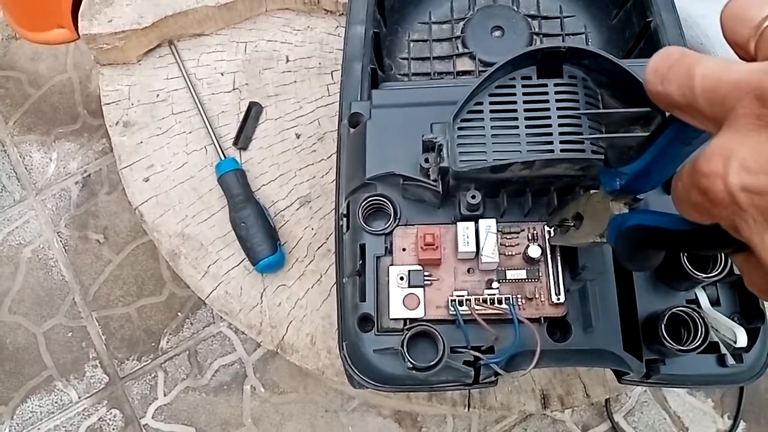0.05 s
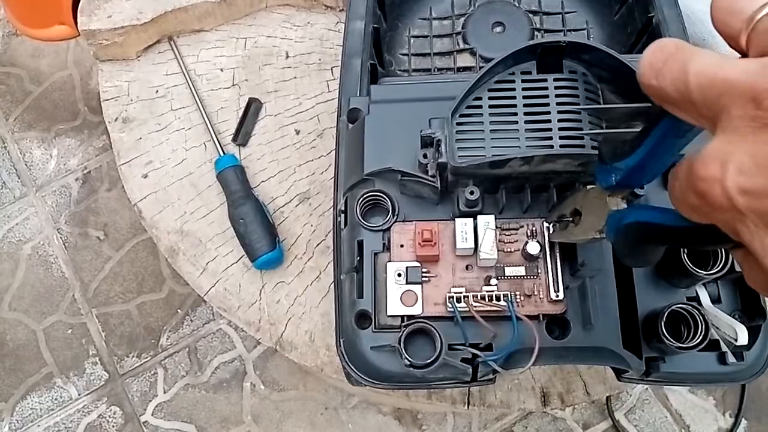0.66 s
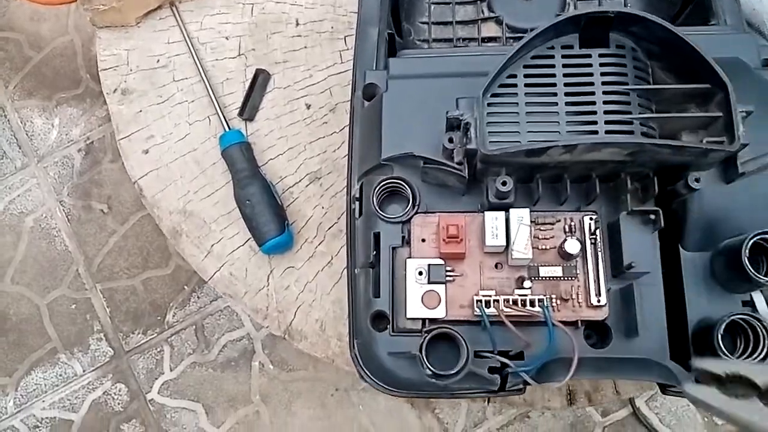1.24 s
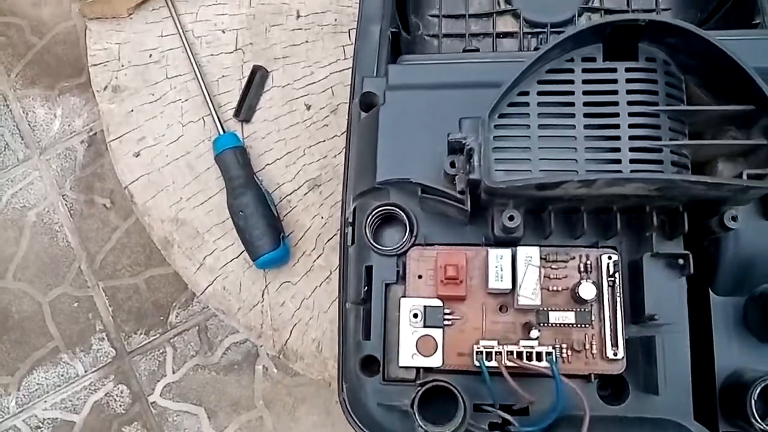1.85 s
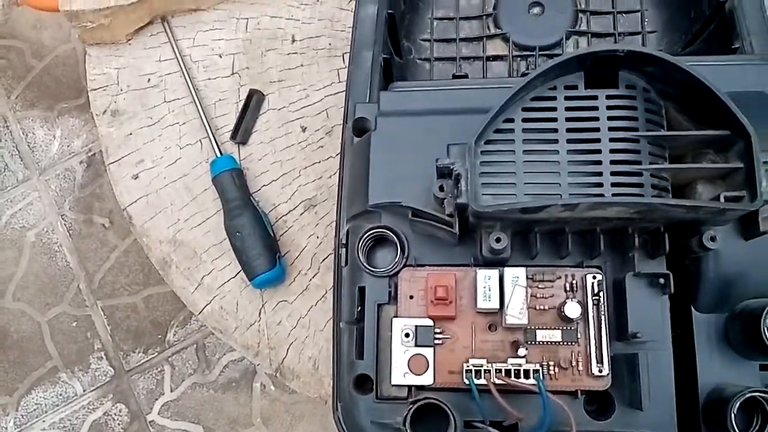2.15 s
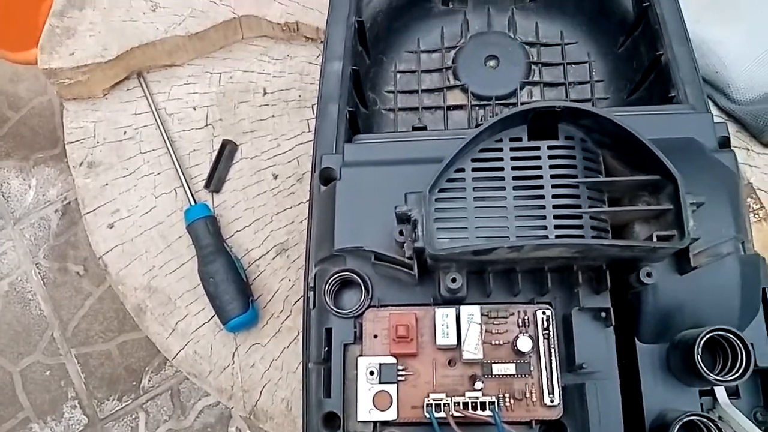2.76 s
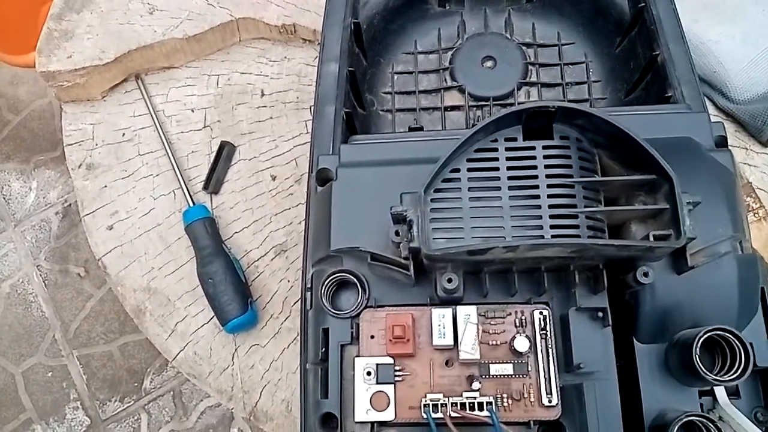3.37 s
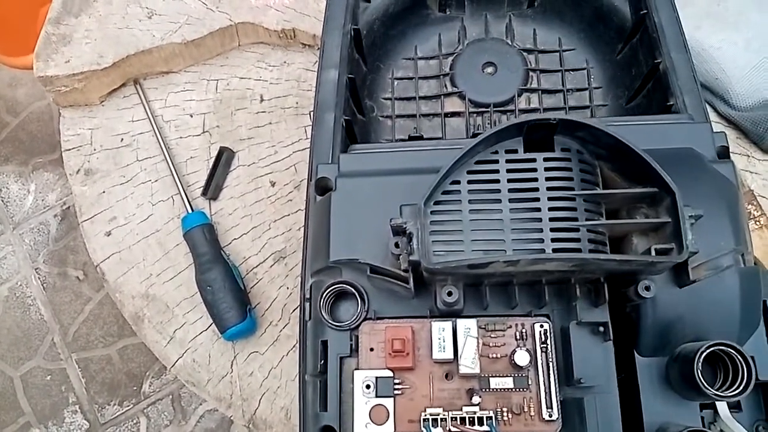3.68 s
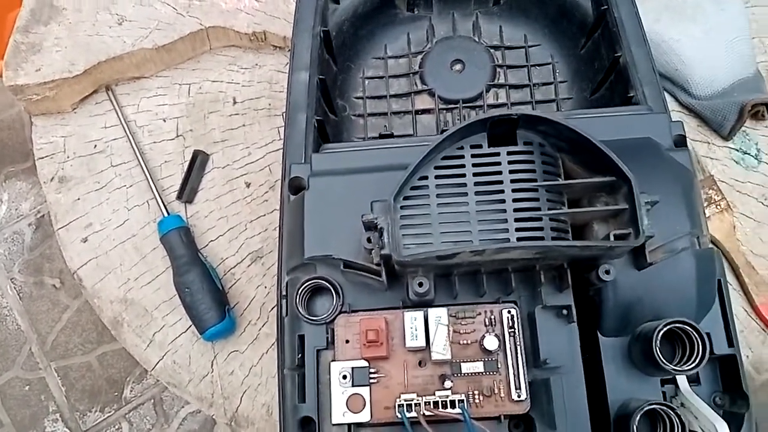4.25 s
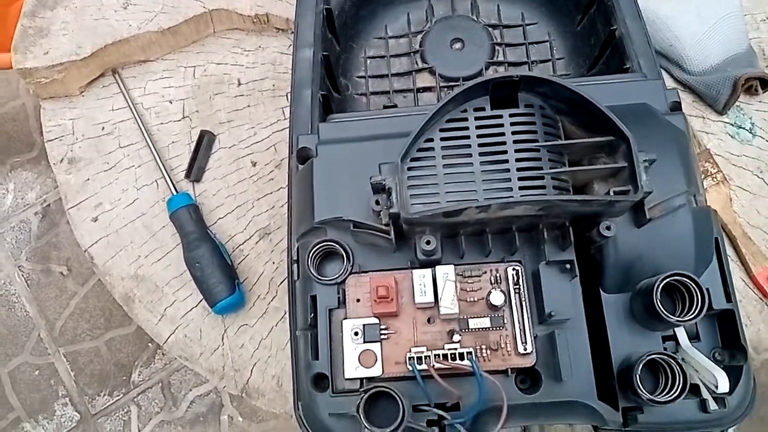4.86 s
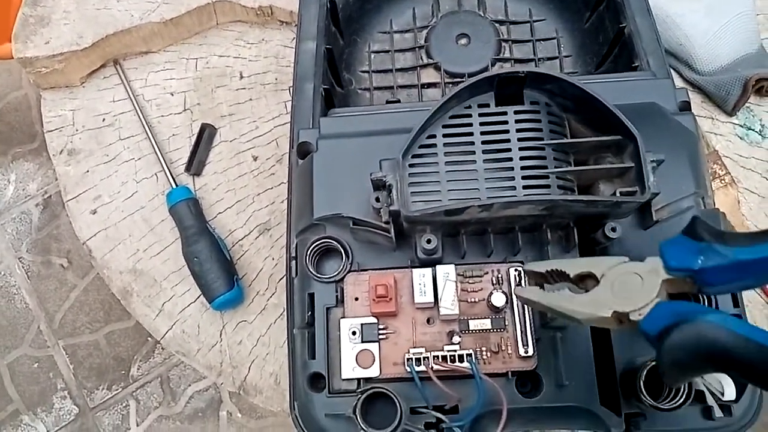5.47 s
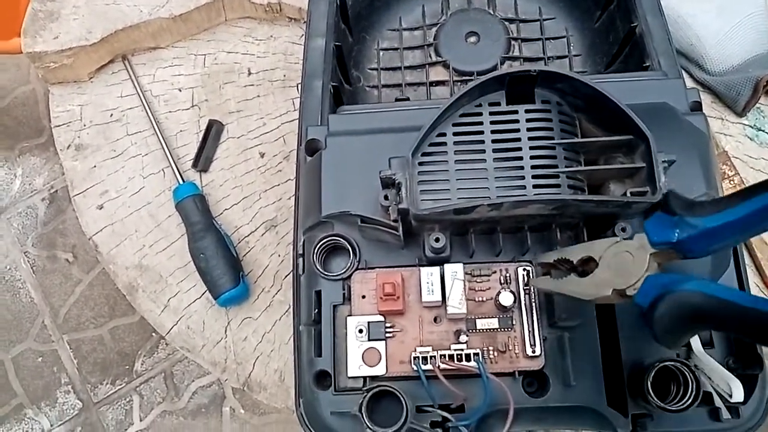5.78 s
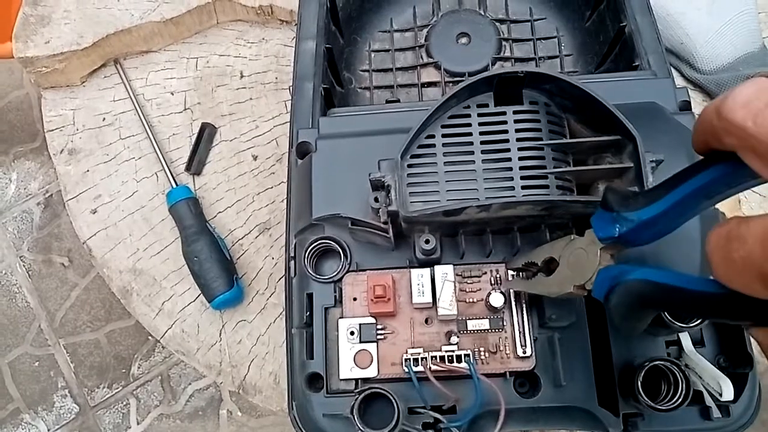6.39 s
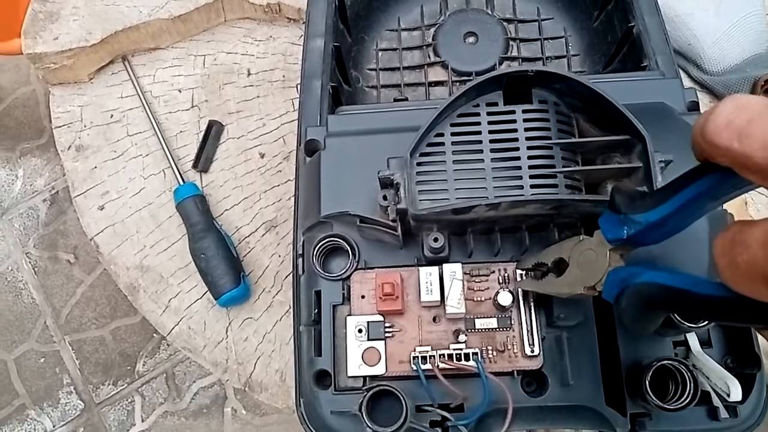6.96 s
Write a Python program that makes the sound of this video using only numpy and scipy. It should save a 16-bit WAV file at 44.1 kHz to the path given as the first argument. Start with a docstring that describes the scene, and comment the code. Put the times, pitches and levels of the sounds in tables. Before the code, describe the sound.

A vacuum cleaner motor whines without a break, heard from close by with its casing open. Several high tones sit over an even rush of air through the plastic body. The sharpest whistle grows and recedes a few times while the speed wobbles a little. The right side sounds brighter, and a faint, fluttering wind rumble lies underneath.

```python
"""An opened vacuum cleaner, close by

The motor speed wanders around 437 turns a second. Rotor and impeller whine on harmonics of that speed,
the ninth strongest, and the tones swell as they pass narrow resonances. Turbulent air rushes through
the plastic housing. The sound reaches the left microphone first, where a draught rumbles most;
the right one hears it brighter."""
import sys
import numpy as np
from scipy import signal
from scipy.fft import irfft
from scipy.io import wavfile

SR = 44100
rng = np.random.default_rng(int(sys.argv[2]) if len(sys.argv) > 2 else 0)


def log_audio(samples):
    """Write samples as a 16-bit WAV file to the path given in sys.argv[1]."""
    # one column per channel
    frames = np.atleast_2d(samples).T
    # limit to full scale, then quantise
    limited = np.clip(frames, -1, 1)
    pcm = np.round(limited * 32767).astype(np.int16)
    wavfile.write(sys.argv[1], SR, pcm)


N = 314433
T = np.arange(N) / SR
HZ = np.maximum(np.arange(N // 2 + 1) * SR / N, 1)


def from_db(db):
    """Amplitude ratio of a level in decibels."""
    return 10 ** (np.asarray(db) / 20)


def in_time(rows):
    """Linear interpolation of a time curve at every sample."""
    return np.interp(T, *np.transpose(rows))


def swing(rows):
    """Deviation of a level curve from its mean, in dB."""
    level_db = in_time(rows)
    return level_db - level_db.mean()


def in_frequency(rows):
    """Interpolation of each column of a spectrum over log frequency."""
    hz, *columns = np.transpose(rows)
    return np.array([np.interp(np.log(HZ), np.log(hz), column) for column in columns])


def bell(hz, width_hz, height):
    """Gaussian over frequency, given its full width at half height."""
    return height * 2 ** -((2 * (HZ - hz) / width_hz) ** 2)


def white(count):
    """Spectra of independent white noises at 0 dB per Hz."""
    shape = (count, len(HZ))
    return (rng.standard_normal(shape) + 1j * rng.standard_normal(shape)) * np.sqrt(N * SR) / 2


def drift(rate_hz, hop=32):
    """Low-pass noise of unit variance: a smooth random fluctuation."""
    pole = np.exp(-2 * np.pi * rate_hz * hop / SR)
    count = N // hop + 2
    slow = signal.lfilter([1], [1, -2 * pole, pole ** 2], rng.standard_normal(2 * count))[count:]
    return np.interp(np.arange(N) / hop, np.arange(count), slow / slow.std())


# Strength of the draught, used as a swing: time_s, level_db
GUST_LEVEL = [(0.0, -32), (0.23, -34.5), (0.32, -28), (1.2, -36.5), (2.74, -38.5), (2.79, -35.5),
              (3.79, -40), (3.87, -32), (3.99, -40), (5.05, -33), (5.11, -36), (5.66, -31), (7.13, -32.5)]
# Rumble spectrum: frequency_hz, left_db_per_hz, right_db_per_hz
DRAUGHT_SPECTRUM = [(15, -92, -90), (38, -88, -91), (80, -64.5, -67), (139, -58.5, -72.5),
                    (206, -65.5, -67.5), (304, -67.5, -78), (730, -89.5, -80.5)]


def draught(left_follow=0.98, right_follow=0.4, lumps_db=3.0):
    """Wind noise: local pressure fluctuations give each microphone its own lumpy rumble."""
    rumble = irfft(from_db(in_frequency(DRAUGHT_SPECTRUM)) * white(2), N)
    gust_db = swing(GUST_LEVEL) * np.array([[left_follow], [right_follow]])
    flutter_db = lumps_db * np.array([drift(30), drift(10)])
    return rumble * from_db(gust_db + flutter_db)


# Broad spectrum of the airflow: frequency_hz, left_db_per_hz, right_db_per_hz
AIR_SPECTRUM = [(60, -95, -87), (255, -66.5, -63), (350, -73.5, -70.5), (740, -63.5, -63.5),
                (1245, -60.5, -58.5), (1365, -64.5, -65.5), (1780, -58.5, -61.5), (3240, -64, -59.5),
                (4960, -61.5, -58.5), (6500, -58.5, -55.5), (7810, -68, -59), (9900, -68, -66.5),
                (12500, -95, -73), (16000, -97, -69)]
# Resonances and notches of the housing: centre_hz, width_hz, left_db, right_db
HOUSING_RESONANCES = [(629, 236, 5, 8), (783, 110, -7.5, -4), (1480, 100, -3.5, -6.5), (2297, 244, 5.5, 6),
                      (2610, 490, 4.5, 3.5), (5930, 250, 5.5, 3.5), (6600, 220, 0.5, 4)]
# Thin sizzle at the very top: centre_hz, width_hz, gain_db
SIZZLE_PEAK = (14960, 1100, 10.7)
# Likeness of the air noise at the two microphones: frequency_hz, correlation
AIR_COHERENCE = [(150, 0.12), (320, 0.88), (620, 0.99), (1050, 0.8), (1600, 0.1), (2300, 1), (3000, 0.059),
                 (9000, 0.19)]


def housing_spectrum(right_delay_s=0.00095):
    """Source and filter: the housing colours flow noise, partly coherent between the microphones."""
    shared, own = white(1), white(2)
    coherence = np.clip(in_frequency(AIR_COHERENCE), 0, 1)
    arrival = np.exp(-2j * np.pi * HZ * np.array([[0], [right_delay_s]]))
    housing_db = sum(bell(hz, width_hz, np.array([[left_db], [right_db]]))
                     for hz, width_hz, left_db, right_db in HOUSING_RESONANCES)
    colour = from_db(in_frequency(AIR_SPECTRUM) + housing_db + bell(*SIZZLE_PEAK))
    return colour * (np.sqrt(coherence) * shared * arrival + np.sqrt(1 - coherence) * own)


# Low body of the sound around the second harmonic, used as a swing: time_s, level_db
BODY_LEVEL = [(0.0, -27), (0.5, -29.5), (0.63, -27.5), (2.0, -25), (2.08, -27.5), (2.44, -30.5),
              (2.58, -26.5), (2.72, -28), (5.22, -29.5), (6.69, -26), (7.13, -30)]


def rushing_air(angle, chop_depth=0.11, rasp_flutter_db=1.5, flicker_db=0.86, split_hz=3000):
    """Amplitude modulation of turbulence: body, rasp and hiss leave by different openings, swell apart."""
    gust_db, body_db = swing(GUST_LEVEL), swing(BODY_LEVEL)
    rush = housing_spectrum()
    rasp_share = bell(hz=2250, width_hz=600, height=0.72)
    rasp = irfft(rush * rasp_share, N) * from_db(0.079 * gust_db + rasp_flutter_db * drift(4.8))
    rest = rush * (1 - rasp_share)
    low = rest / (1 + (HZ / split_hz) ** 4)
    band = low * bell(hz=765, width_hz=780, height=0.45)
    body = irfft(low - band, N) + irfft(band, N) * from_db(0.29 * body_db)
    pan_db = 0.61 * gust_db * np.array([[0.5], [-0.5]])  # further left in a gust
    hiss = irfft(rest - low, N) * from_db(pan_db)
    hiss *= 1 + chop_depth * np.cos(angle)  # one pulse a turn
    return (body + rasp + hiss) * from_db(0.22 * body_db + flicker_db * drift(7.9))


# Motor speed: time_s, turns_per_s
MOTOR_SPEED = [(0.0, 434.5), (0.12, 428.6), (0.26, 436.7), (0.39, 439.8), (0.67, 441.2), (0.73, 443.7),
               (1.19, 434.6), (1.31, 440.7), (1.98, 442.0), (2.15, 434.0), (2.56, 443.8), (2.7, 436.2),
               (2.99, 440.0), (3.24, 436.8), (3.44, 428.1), (3.55, 434.3), (3.86, 439.5), (4.61, 440.2),
               (4.78, 429.6), (4.93, 436.7), (5.24, 435.3), (5.47, 427.6), (5.62, 435.6), (5.8, 424.5),
               (5.92, 432.3), (6.23, 436.8), (6.32, 430.7), (7.13, 428.8)]


def shaft_rotation():
    """Phase is the integral of frequency: the shaft's speed in Hz and its angle in radians."""
    speed_hz = in_time(MOTOR_SPEED)
    return speed_hz, 2 * np.pi * np.cumsum(speed_hz) / SR


# Narrow resonances met by the tones: centre_hz, width_hz, gain_db
TONE_RESONANCES = [(444, 11, 3.5), (884, 16, 3), (1319, 54, 3.5), (4330, 180, 5.5), (5222, 65, 4),
                   (6627, 95, 2), (7414, 160, 3.2), (7885, 95, 5.5)]
# Third harmonic, the main pitch heard, used as a swing: time_s, level_db
THIRD_LEVEL = [(0.0, -3.5), (0.9, -0.5), (1.5, -1), (2.2, -1), (4.25, -1), (5.7, 0.5), (7.13, 0)]
# Impeller whistle on the ninth harmonic, used as a swing: time_s, level_db
WHISTLE_LEVEL = [(0.0, -31), (0.51, -23.5), (0.91, -31.5), (2.09, -17), (3.39, -23), (3.66, -19),
                 (3.91, -19.5), (3.97, -19), (4.54, -26.5), (4.56, -32.4), (4.7, -16), (4.78, -26),
                 (4.96, -17.5), (5.28, -24.5), (7.0, -25.1), (7.13, -27.6)]


def harmonic_swells(speed_hz, free_fade_db=1.6, guided_fade_db=0.7, fade_db_per_harmonic=0.0338):
    """Resonance lifts each passing harmonic; level curves and random fading join in a gain of rms 1."""
    response_db = sum(bell(*resonance) for resonance in TONE_RESONANCES)
    gust_db, body_db, whistle_db = swing(GUST_LEVEL), swing(BODY_LEVEL), swing(WHISTLE_LEVEL)
    # harmonic number: the level curve it follows
    guide_db = {1: 0.3 * gust_db, 2: 1.6 * body_db, 3: swing(THIRD_LEVEL),
                9: whistle_db, 12: 0.27 * whistle_db, 18: -0.5 * gust_db}
    swells = {}
    for k, *_ in WHINE_HARMONICS:
        fade_db = guided_fade_db + fade_db_per_harmonic * k if k in guide_db else free_fade_db
        resonance_db = np.interp(k * speed_hz, HZ, response_db)
        gain = from_db(resonance_db + guide_db.get(k, 0) + fade_db * drift(3))
        swells[k] = gain / np.sqrt(np.mean(gain ** 2))
    return swells


# Rotor and impeller tones before trim and swell: harmonic, left_db, right_db, right_delay_ms
WHINE_HARMONICS = [(1, -48.3, -39.8, 2.03), (2, -37.5, -35.0, 0.87), (3, -28.8, -26.3, 0.97),
                   (4, -37.0, -46.0, 0.9), (5, -32.0, -39.0, 0.91), (6, -31.0, -32.5, 0.98),
                   (7, -50.5, -42.5, 0.83), (8, -51.0, -38.5, 0.89), (9, -34.5, -21.5, 0.93),
                   (10, -36.0, -28.2, 1.05), (11, -42.0, -34.5, 0.97), (12, -34.5, -31.5, 0.97),
                   (13, -41.5, -43.0, 0.9), (14, -47.0, -39.5, 0.94), (15, -39.0, -38.0, 0.95),
                   (16, -48.0, -39.5, 0.97), (17, -42.0, -33.0, 1.01), (18, -37.0, -25.5, 0.95),
                   (19, -45.0, -36.5, 0.95), (20, -44.5, -37.5, 0.97), (23, -50.0, -47.5, 0.96),
                   (24, -53.0, -47.5, 0.93), (27, -54.0, -42.0, 0.95)]


def motor_whine(speed_hz, angle, shake_rad=0.07, shake_hz=10, scatter=0.1, scatter_hz=26,
                wander_rad=0.075, ripple_depth=0.035, mains_hz=50):
    """Periodic forcing: harmonics lock to an unsteady shaft; turbulence scatters each into a skirt."""
    swells = harmonic_swells(speed_hz)
    shaken_angle = angle + shake_rad * drift(shake_hz)
    whine = np.zeros((2, N))
    for k, left_db, right_db, right_delay_ms in WHINE_HARMONICS:
        trim_db = 0.12 - 0.0319 * k
        # the skirt fades less than its tone, so a weak tone flutters more
        skirt = scatter * np.sqrt(k * swells[k])
        phase = k * shaken_angle + rng.uniform(0, 2 * np.pi)
        # shifting reflections turn the phase between the microphones, most for short waves
        left_phase = phase + k * wander_rad * drift(0.7)
        right_phase = phase - 2 * np.pi * k * speed_hz * right_delay_ms / 1000
        for mic, (mic_phase, level_db) in enumerate([(left_phase, left_db), (right_phase, right_db)]):
            in_phase = (swells[k] + skirt * drift(scatter_hz)) * np.cos(mic_phase)
            quadrature = skirt * drift(scatter_hz) * np.sin(mic_phase)
            whine[mic] += np.sqrt(2) * from_db(level_db + trim_db) * (in_phase + quadrature)
    # the torque pulses with each half wave of the mains
    return whine * (1 + ripple_depth * np.cos(2 * np.pi * 2 * mains_hz * T))


def scene():
    """Superposition of whine, air and draught; one shaft drives the tones and pulses the hiss."""
    speed_hz, angle = shaft_rotation()
    return motor_whine(speed_hz, angle) + rushing_air(angle) + draught()


def record(dry, ceiling=0.9, cutoff_hz=15650):
    """Soft saturation rounds the highest peaks; a steep low-pass filter limits the bandwidth."""
    rounded = dry / (1 + (dry / ceiling) ** 6) ** (1 / 6)
    low_pass = signal.ellip(12, 0.1, 80, cutoff_hz, fs=SR, output="sos")
    return signal.sosfilt(low_pass, rounded)


dry = scene()
out = record(dry)
log_audio(out)
```